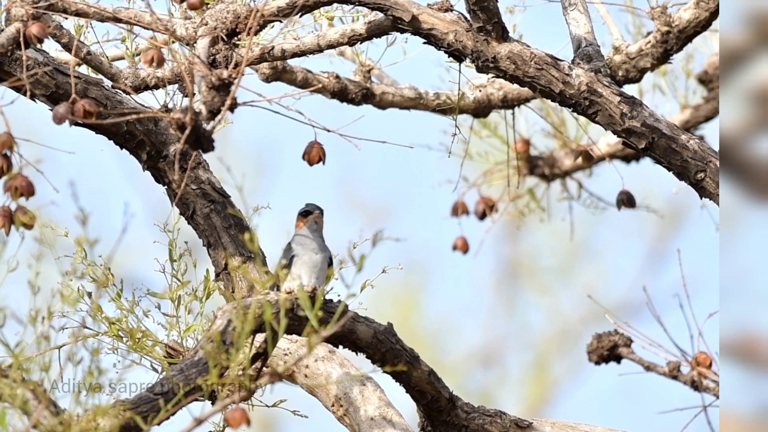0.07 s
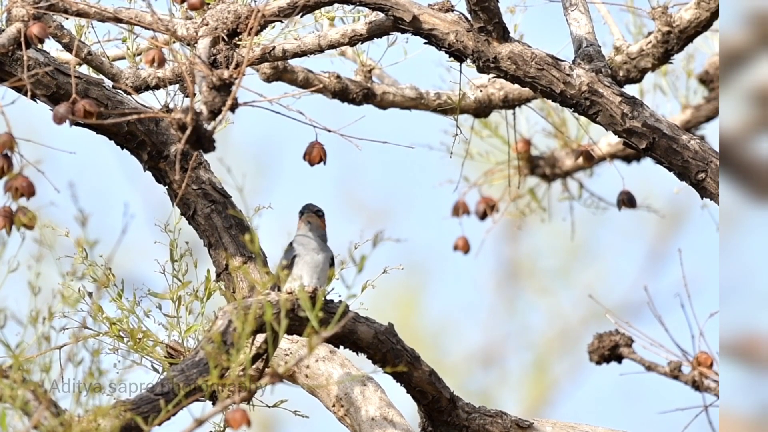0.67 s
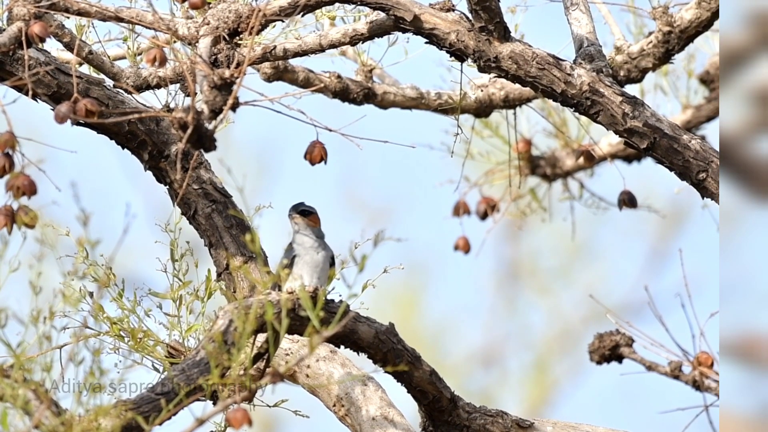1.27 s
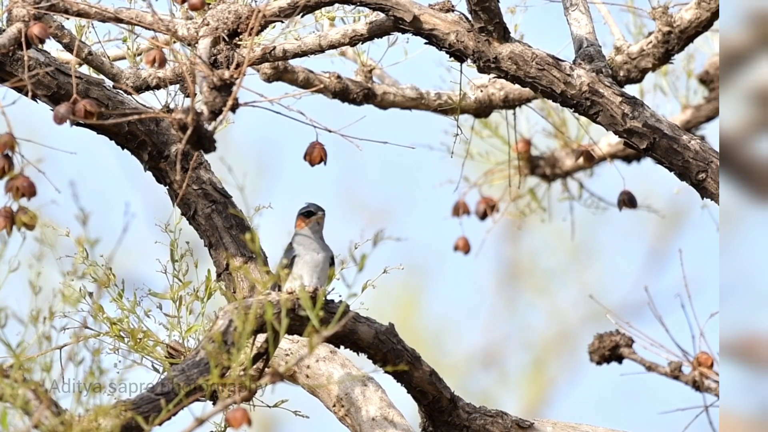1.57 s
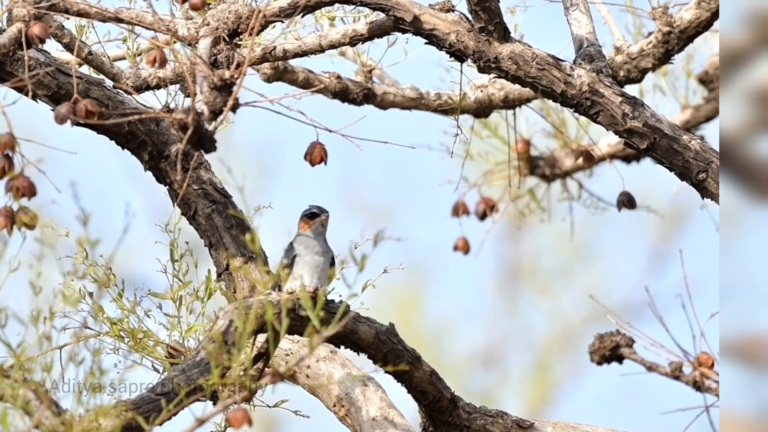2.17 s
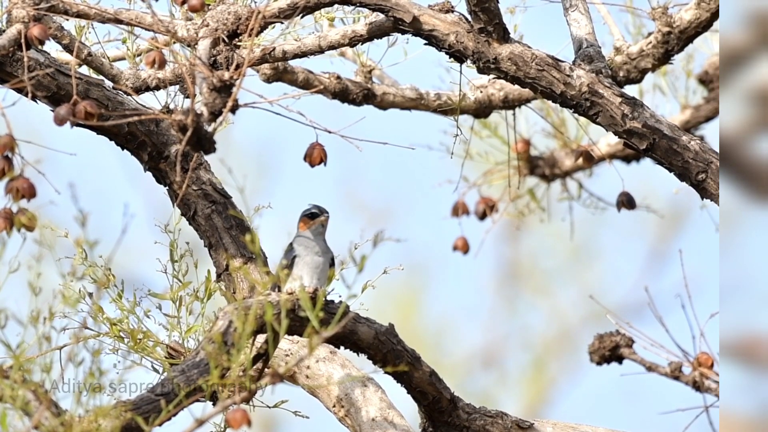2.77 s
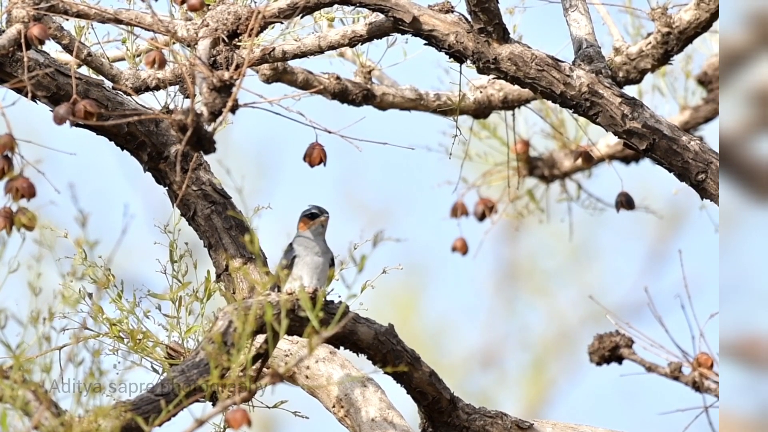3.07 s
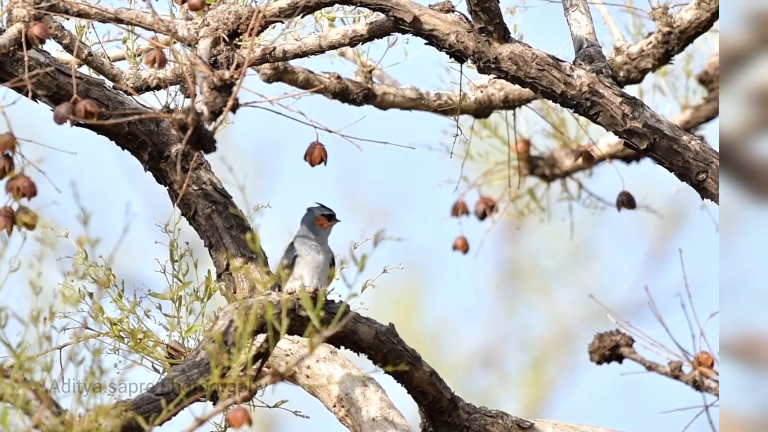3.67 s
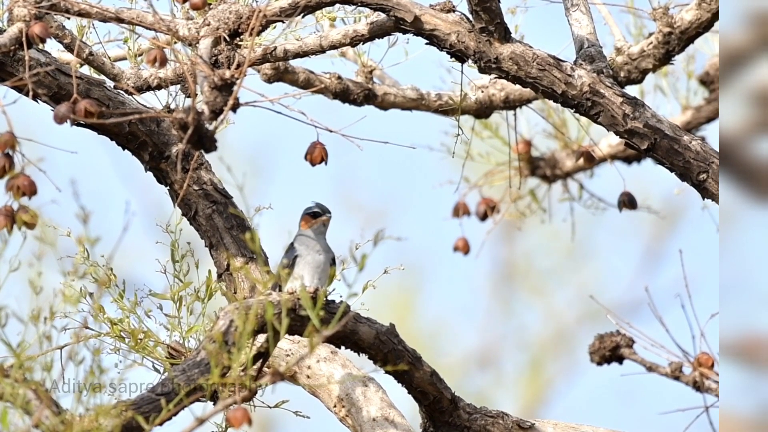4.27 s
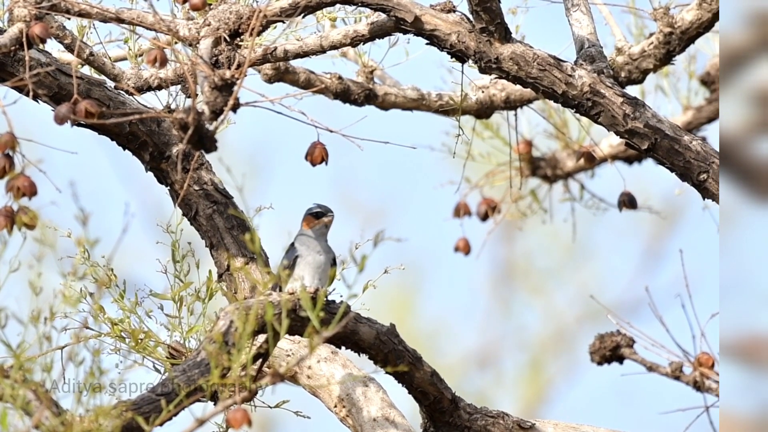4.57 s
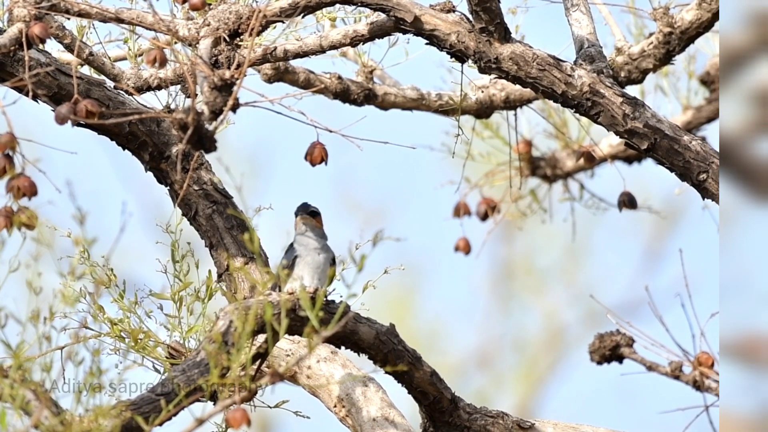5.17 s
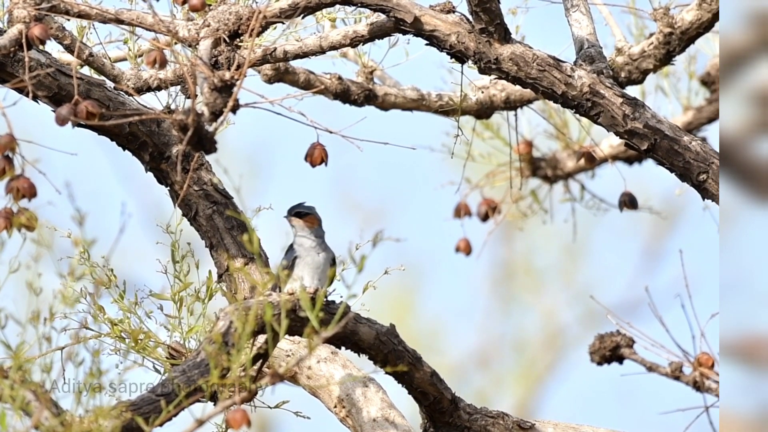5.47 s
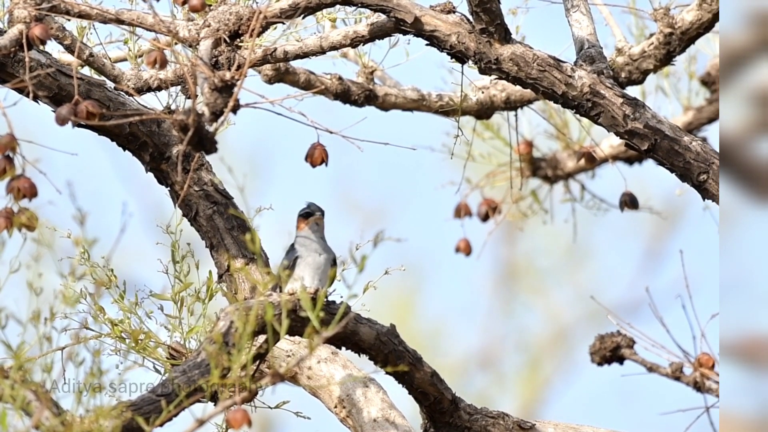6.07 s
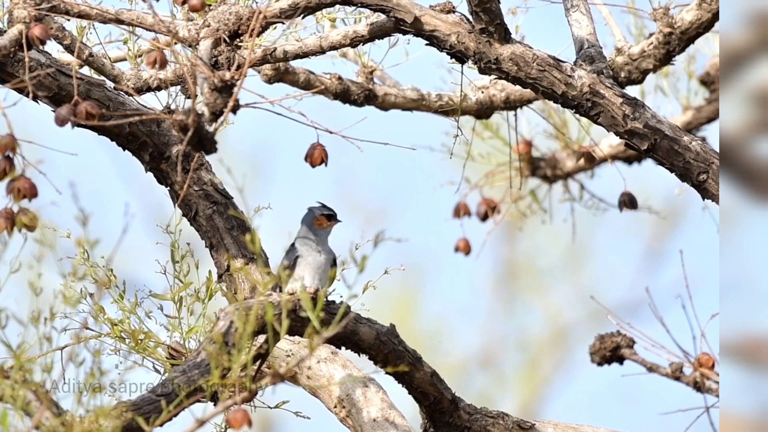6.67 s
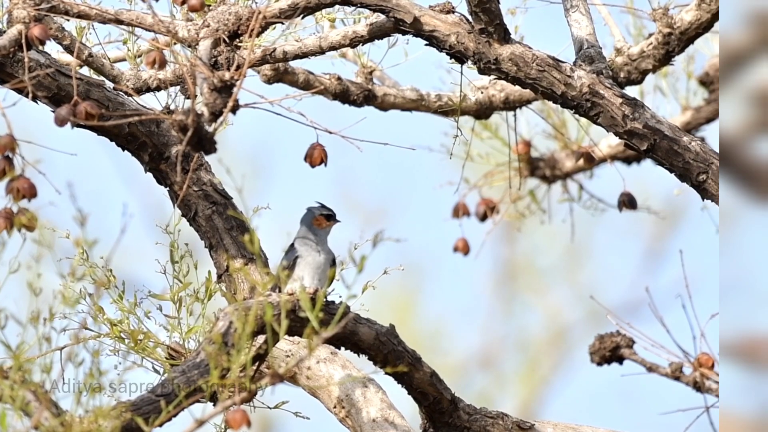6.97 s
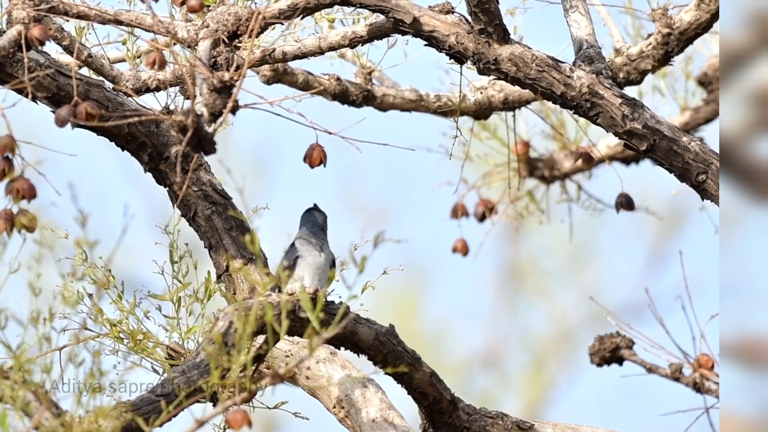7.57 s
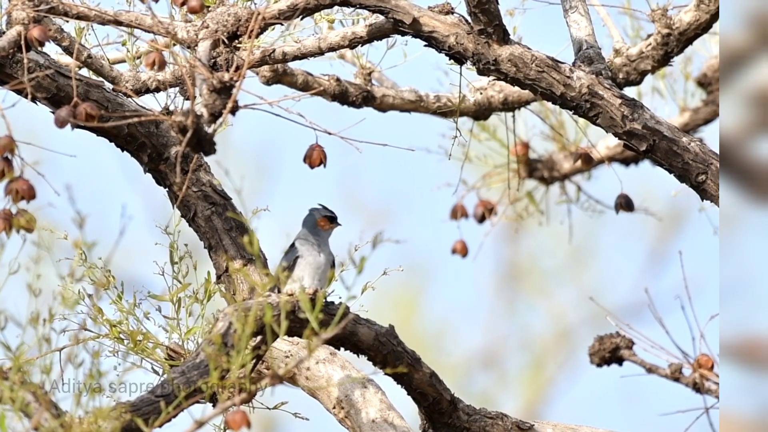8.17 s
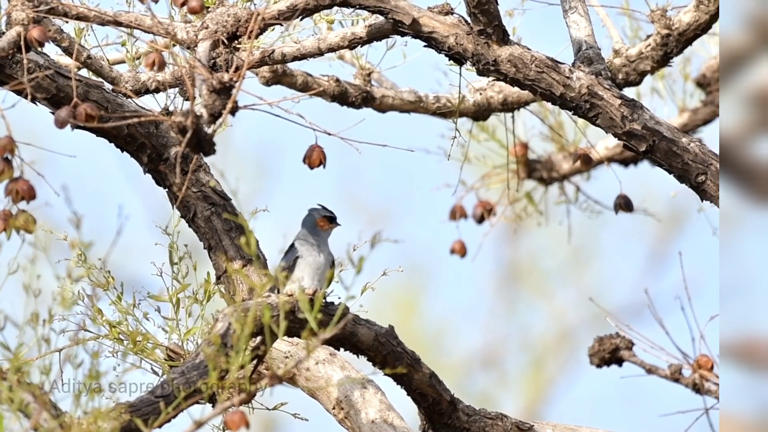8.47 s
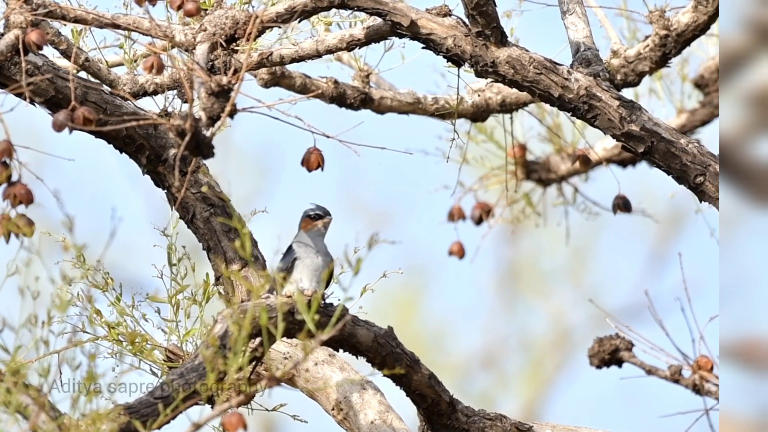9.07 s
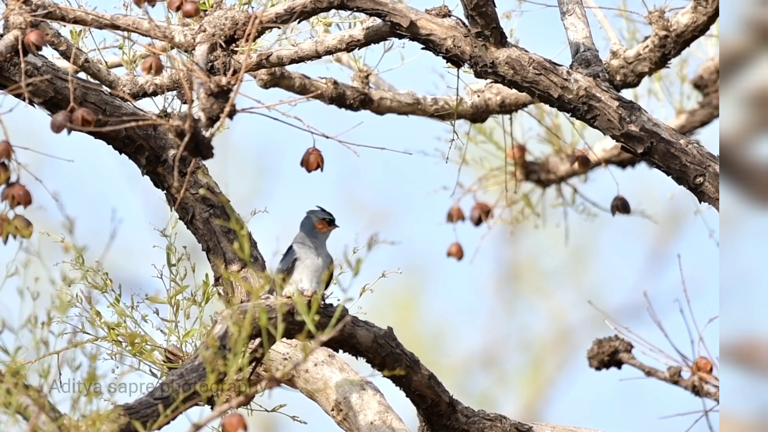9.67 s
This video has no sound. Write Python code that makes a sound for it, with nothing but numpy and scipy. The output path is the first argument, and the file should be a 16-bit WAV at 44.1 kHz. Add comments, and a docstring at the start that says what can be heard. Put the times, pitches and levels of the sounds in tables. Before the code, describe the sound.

A small bird gives one sharp, close call in quiet woodland, while distant birds chirp and light wind buffets the microphone.

```python
"""A small bird on a branch close to the microphone gives one sharp call in open woodland,
an arch of pitch whose harmonics sweep through the resonances of its beak. Farther off, birds
chirp, whistle and trill, their echoes scattered by trunks and leaves, over a soft hiss and a
distant drone. Light gusts buffet the right side of the microphone, and a few twigs tick."""
import sys
import numpy as np
from scipy import signal
from scipy.fft import rfft, irfft
from scipy.io import wavfile
from scipy.ndimage import uniform_filter1d

SR = 44100
rng = np.random.default_rng(int(sys.argv[2]) if len(sys.argv) > 2 else 0)


def digitize_waveform(pressure):
    """Quantize a signal to 16-bit integers and store it at the path in sys.argv[1].

    Rows of a 2-D input are taken as channels; values are limited to [-1, 1].
    """
    field = np.atleast_2d(pressure).T
    bounded = np.clip(field, -1, 1)
    quanta = np.round(bounded * 32767).astype(np.int16)
    wavfile.write(sys.argv[1], SR, quanta)


N = 437031


def gain_of(db):
    """Decibels to amplitude."""
    return 10 ** (np.asarray(db) / 20)


def unit_rms(x):
    """Scales to rms 1."""
    return x / np.sqrt(np.mean(x ** 2) + 1e-20)


def at_hz(points, hz):
    """Reads a table on a log-frequency axis."""
    f, value = np.transpose(points)
    return np.interp(np.log(hz + 1), np.log(f + 1), value)


def curve(rows, column=1):
    """One column of a timed table, at every sample."""
    rows = np.asarray(rows)
    return np.interp(np.arange(N) / SR, rows[:, 0], rows[:, column])


def place(mix, start_s, sound, pan_db=0):
    """Mixes a sound in, pan_db louder on the left; it reaches the microphone's far side later."""
    lag_s_per_db, longest_lag_s = 2.5e-5, 1.6e-4
    for channel, lean_db in zip(mix, (pan_db, -pan_db)):
        lag_s = np.clip(-lean_db * lag_s_per_db, 0, longest_lag_s)
        part = channel[round(start_s * SR) + int(lag_s * SR):][:len(sound)]
        part += gain_of(lean_db / 2) * sound[:len(part)]


def wander(n, rate_hz):
    """Smooth random motion of rms 1."""
    hz = np.fft.rfftfreq(n, 1 / SR)
    return unit_rms(irfft(rfft(rng.standard_normal(n)) / (1 + (hz / rate_hz) ** 4), n))


def noise(colour, patchy_db=0, likeness=None, size=1024):
    """Stereo noise of a given colour, with drifting patches in time and pitch."""
    frames, hz = 4 * N // size + 5, np.fft.rfftfreq(size, 1 / SR)
    a, b, c, d, patches = rng.standard_normal((frames, len(hz), 5)).T
    patches = unit_rms(uniform_filter1d(uniform_filter1d(patches, size=9, axis=0), size=7, axis=1))
    shared = np.clip(at_hz(likeness, hz), -1, 1)[:, None] if likeness else 0
    left = a + 1j * b
    right = shared * left + np.sqrt(1 - shared ** 2) * (c + 1j * d)
    spectra = np.array([left, right]) * gain_of(patchy_db * patches)
    white = signal.istft(spectra, nperseg=size, noverlap=size - size // 4)[1][:, :N]
    tilt = gain_of(at_hz(colour, np.fft.rfftfreq(N, 1 / SR)))
    return unit_rms(irfft(rfft(white) * tilt, N))


def note(length_s, first_hz, middle_hz, last_hz, rough, flutter_hz, flicker_db=0):
    """A whistled glide through three pitches, with a flutter in pitch and strength."""
    progress = np.linspace(0, 1, max(int(length_s * SR), 64))
    hz = np.polyval(np.polyfit([0, .5, 1], [first_hz, middle_hz, last_hz], 2), progress)
    hz *= 1 + rough * wander(len(hz), flutter_hz)
    swell = np.sqrt(2 * abs(np.sin(np.pi * progress)))
    flicker = unit_rms(gain_of(flicker_db * wander(len(hz), flutter_hz)))
    return swell * flicker * np.sin(2 * np.pi * np.cumsum(hz) / SR)


def trees(x, t60, gap_s=.002):
    """Trunks and leaves scatter sparse echoes, different on each side of the microphone."""
    t = np.arange(SR) / SR
    taps = rng.standard_normal((2, SR)) * (rng.random((2, SR)) < 2000 / SR)  # 2000 echoes a second
    taps *= gain_of(-60 * t / t60) * (t > gap_s)
    taps /= np.linalg.norm(taps, axis=1, keepdims=True)
    return signal.fftconvolve(x, taps, axes=1)[:, :N]


def air():
    """The hush of the woods all round, with narrow bands of distant drone and a thin insect whine."""
    # Still air. Each row: frequency in Hz, relative spectral level in dB.
    colour = [(15, -48), (25, -9.5), (91, -1.5), (113, -4.5), (174, -9), (194, -11.5), (261, -10.5),
              (291, -13.5), (324, -13.5), (540, -24), (618, -14), (1030, -18.5), (1630, -21), (5200, -27),
              (15700, -36.5)]
    # How alike the two channels are. Each row: frequency in Hz, correlation.
    likeness = [(30, 0.26), (100, 0.93), (290, 0.69), (640, 0.15), (1400, -0.43), (3100, -0.51),
                (7000, -0.08), (15000, 0.18)]
    # Where the hush leans. Each row: frequency in Hz, left over right in dB.
    lean = [(40, -9.5), (200, 1.5), (400, 2), (1300, -3.5), (4400, 0.6), (15000, -2)]
    # Drone and whine. Each row: centre in Hz, width in Hz, level in dB.
    drones = [(86.8, 12.7, -57), (175.3, 13.3, -66.5), (514, 104, -67.5), (644.7, 13.5, -69.5),
              (9250, 70, -96)]
    hz = np.fft.rfftfreq(N, 1 / SR)
    lean_db = at_hz(lean, hz) * np.array([[.5], [-.5]])
    hush = gain_of(lean_db - 51) * rfft(noise(colour, patchy_db=1, likeness=likeness))
    white = rfft(noise([(1, 0), (SR / 2, 0)], likeness=likeness))
    bands = 0
    for centre, width, db in drones:
        peak = gain_of(db) * np.sqrt(SR / 2 / width)
        bands += peak / (1 + ((hz - centre) / (width * np.sqrt(.5))) ** 4)
    return irfft(hush + white * bands, N)


def chorus():
    """Many far birds and insects, mostly off to the right, blur into three restless bands."""
    # One voice range per band. Each row: frequency in Hz, relative spectral level in dB.
    ranges = [
        [(500, -35), (950, -16), (1280, 5.5), (1600, 0), (2200, -7), (2700, -14), (8000, -44)],
        [(1000, -39), (1800, -11.5), (2400, 1.5), (3100, -0.5), (4000, -7), (5000, -29), (10000, -35)],
        [(2000, -24), (3500, -4), (5200, 0.5), (7000, -2), (7900, -16.5), (10000, -23)],
    ]
    # The chorus swells and ebbs. Each row: time in seconds, then low, middle and high band in relative dB.
    levels = [(0, -64, -62.5, -62.5), (2.5, -69.5, -65.5, -61), (3.4, -60, -64.5, -64.5),
              (4.2, -62, -59, -63), (4.65, -56.5, -57, -59), (5.2, -71, -62, -67), (5.8, -66, -63, -64),
              (6.02, -64, -60.5, -69), (6.27, -56, -62, -65), (6.55, -66, -63, -67),
              (7.4, -70.5, -66, -67.5), (8.2, -69, -61, -64), (9.9, -62.5, -59, -56)]
    voices = sum(noise(colour, patchy_db=3) * gain_of(curve(levels, column) - 1)
                 for column, colour in enumerate(ranges, 1))
    pan_db = curve([(0, -.5), (4.5, -7.5), (7.5, -12.5), (9.9, -7)])
    return voices * gain_of([pan_db / 2, -pan_db / 2])


def chirps(scoop=.32):
    """Short glides of small birds in the surrounding trees, and one raspy squeak."""
    # Chirps. Each row: start and length in seconds, first and last pitch in Hz,
    # relative level in dB, left over right in dB.
    glides = [(0.008, 0.056, 4160, 3270, -55.5, 15.5), (0.411, 0.021, 3910, 5030, -48.5, 8),
              (0.421, 0.09, 3675, 2540, -52, 1.5), (0.774, 0.028, 6300, 4550, -44, -3),
              (0.802, 0.017, 3950, 5700, -49, 3), (0.814, 0.016, 5700, 4000, -46, 2.5),
              (0.856, 0.022, 4430, 4050, -48.5, 10), (.91, 0.022, 3380, 3630, -53, 13),
              (0.938, 0.0282, 3850, 2990, -51, 5), (2.424, 0.044, 3150, 2900, -53, 14.5),
              (2.745, 0.093, 3270, 3210, -65, 18), (2.989, 0.12, 3380, 2970, -57, 9),
              (3.278, 0.15, 2885, 2880, -58.5, -3), (3.434, 0.027, 4300, 3400, -52.5, 4.5),
              (3.83, 0.018, 3260, 4000, -52, -3.5), (4.064, 0.038, 3040, 2590, -53.5, -5),
              (4.268, 0.023, 5300, 3350, -51.5, 11), (5.147, 0.095, 3005, 3620, -51.5, -12.5),
              (5.165, .06, 6180, 7060, -60, -8), (5.225, 0.047, 4700, 5240, -52.5, -7),
              (5.707, .035, 6080, 3990, -49, 5.5), (6.086, .044, 5600, 5090, -53, 4.5),
              (6.242, .04, 4450, 5520, -59, 6.5), (7.31, 0.045, 5750, 2680, -56.5, 9),
              (7.846, 0.029, 6200, 3820, -55, -1), (8.246, .047, 4840, 2510, -50, 9),
              (8.832, .016, 6030, 4500, -51, 10), (8.929, 0.0096, 4700, 7500, -45.5, -9),
              (8.94, 0.013, 6520, 3140, -42, -4.5), (8.957, 0.009, 4250, 6500, -48, -8),
              (9.397, 0.022, 5900, 4140, -52, 9), (9.558, .11, 2860, 3860, -47.5, -12),
              (9.653, .06, 4560, 5050, -63, -6)]
    # Parts of the squeak. Each row: start and length in seconds, first, middle and last pitch in Hz,
    # relative level in dB, left over right in dB.
    squeak = [(3.614, 0.036, 3700, 4030, 4300, -49, 0.0056), (3.62, 0.04, 7900, 7330, 6800, -46.5, 0),
              (3.644, 0.046, 6000, 5020, 4650, -45.5, 0), (3.655, .025, 9900, 9200, 7800, -61, 0)]
    clear, harsh = np.zeros((2, 2, N))
    for start, length, first, last, db, pan_db in glides:
        middle = min(first, last) + scoop * abs(last - first)  # each chirp lingers low
        scratchy = abs(last - first) / length > 12000  # steep glides break up
        rough, flicker_db = (.035, 4.5) if scratchy else (.007, 3)
        chirp = note(length, first, middle, last, rough, flutter_hz=200, flicker_db=flicker_db)
        place(clear, start, gain_of(db) * chirp, pan_db)
    for start, length, *pitches, db, pan_db in squeak:
        rasp = note(length, *pitches, rough=.062, flutter_hz=604, flicker_db=4.5)
        place(harsh, start, gain_of(db) * rasp, pan_db)
    echoes = gain_of(-6.5) * trees(clear, t60=.3) + trees(harsh, t60=.5)
    return gain_of(-3) * clear + gain_of(-1.5) * harsh + echoes


def twitter(count=100):
    """Tiny flicks of song from birds deep in the canopy."""
    out = np.zeros((2, N))
    for when, pitch, slope, size, side in rng.random((count, 5)):
        hz, glide = 3000 + 2600 * pitch, 1 + .5 * (slope - .5)
        flick = note(.027, hz / glide, hz, hz * glide, rough=.029, flutter_hz=300)
        place(out, when * N / SR, gain_of(-70 + 5 * size) * flick, pan_db=10 * (side - .5))
    return out + trees(out, t60=.21)


def twigs(decay_s=.0012):
    """Dry ticks left of the microphone, each a tiny burst in a broad resonance."""
    # Each row: start in seconds, level in dB, resonance in Hz.
    ticks = [(.385, -56, 7500), (.511, -63, 6500), (.683, -43, 4500), (2.833, -51, 7600),
             (3.249, -57, 8000), (6.935, -59, 7500)]
    out, t = np.zeros((2, N)), np.arange(SR // 50) / SR
    for start, db, hz in ticks:
        burst = rng.standard_normal(len(t)) * np.exp(-t / decay_s)
        resonance = signal.butter(2, [hz * .54, min(hz * 1.2, 12000)], "band", fs=SR)
        tick = signal.lfilter(*resonance, burst)
        place(out, start, gain_of(db) * tick / np.std(tick[:SR // 250]), pan_db=8)
    return out + gain_of(-19) * trees(out, t60=.2, gap_s=.0036)


def wind_level(attack_s=.018, release_s=.015):
    """Wind at the microphone in dB: each puff swells, holds and dies away on top of the breeze."""
    # The breeze. Each row: time in seconds, level in dB.
    breeze = [(0, -68), (1.5, -53.5), (2, -50.5), (2.9, -51.5), (4.1, -44.5), (5.55, -51), (5.9, -56),
              (6.6, -50.5), (7.2, -55.5), (7.75, -51), (8.25, -30), (8.8, -28), (9.5, -31.5), (9.9, -32.5)]
    # The puffs. Each row: start and length of the hold in seconds, level in dB.
    puffs = [(0.49, 0.16, -44), (1.79, 0.17, -42), (2.17, 0.156, -43.5), (2.412, 0.077, -41.5),
             (2.793, 0.023, -40), (3.018, 0.076, -34), (3.182, .26, -30.5), (3.623, 0.18, -46.5),
             (4.134, 0.19, -37.5), (4.39, .13, -33), (4.728, .05, -39), (4.881, .11, -31),
             (5.047, 0.12, -34), (5.272, 0.18, -39), (5.679, .1, -37), (6.01, .3, -42), (6.43, 0.025, -43),
             (6.596, 0.22, -37.5), (6.818, 0.14, -33), (7.34, .09, -44), (7.962, 0.052, -34.5),
             (8.156, 0.317, -25), (8.997, 0.53, -27.5), (9.842, 0.12, -30)]
    t = np.arange(N) / SR
    power = gain_of(curve(breeze)) ** 2
    for start, length, db in puffs:
        falloff = np.maximum(start - t, 0) / attack_s + np.maximum(t - start - length, 0) / release_s
        power += (gain_of(db) * np.exp(-np.minimum(falloff, 20))) ** 2
    return 10 * np.log10(power)


def wind():
    """Eddies buffet the microphone's right port; stronger gusts shed smaller ones and sound brighter."""
    # Eddies of a light and a strong gust. Each row: frequency in Hz, relative spectral level in dB.
    light_gust = [(10, -35), (25, -36), (50, -0.5), (90, 2.5), (175, -2.5), (250, -18.5), (400, -49.5),
                  (900, -72)]
    strong_gust = [(10, -50), (25, -30), (50, -23), (85, 3.5), (165, 2), (250, -6.5), (350, -15),
                   (500, -27.5), (800, -39.5), (1500, -80)]
    level_db = wind_level()
    force = np.clip((level_db + 42.5) / 19, 0, 1) ** 1.9
    push = np.sqrt(1 - force) * noise(light_gust, size=2048)
    push += np.sqrt(force) * noise(strong_gust, patchy_db=2.5, size=2048)
    push /= np.sqrt(uniform_filter1d(push ** 2, size=2200, axis=1) + 1e-9)  # even out the noise's swells
    flutter_db = 2.03 * wander(N, rate_hz=37)
    return push * gain_of(level_db + flutter_db) * gain_of([[-24], [-.5]])


def thumps():
    """Lone eddies hit the right port: one swing of pressure and its rebound each."""
    # Each row: time of the peak in seconds, peak level in dB, pitch in Hz, half-length in seconds.
    eddies = [(1.637, -14, 135, .003), (2.199, -28.5, 130, .005), (2.44, -24.5, 65, .007)]
    swings = np.zeros(N)
    for peak_s, db, hz, half_length in eddies:
        t = np.arange(N) / SR - peak_s
        envelope = gain_of(db) / np.cosh(np.clip(t / half_length, -20, 20))
        swings -= envelope * np.cos(2 * np.pi * hz * t)
    return swings * gain_of([[-30], [0]])


def near_bird():
    """Close and central, an arch of pitch sweeps its harmonics through the resonances of the beak."""
    # What throat and open beak let through. Each row: frequency in Hz, gain in dB.
    beak = [(900, -25), (1500, -18), (2100, -14), (2800, -12.5), (3400, -11.5), (4150, -2), (5300, -0.5),
            (6000, -16), (7100, -17.5), (8300, -13.5), (9200, -23), (10500, -23.5), (11600, -37),
            (14700, -41)]
    # The beak shuts and its resonances sink. Each row: time in seconds, factor on their frequency.
    beak_opening = [(1.835, 0.98), (1.86, 0.73), (1.89, 0.74)]
    start_s, top_s, end_s = 1.763, 1.801, 1.935
    start_hz, top_hz, rest_hz, half_sink_s = 1052, 2114, 564, .044
    attack_s, hold_s, release_s = .014, .082, .017
    db_per_octave, fade_db_per_s = 11, 175
    t = np.arange(start_s, end_s, 1 / SR)
    age = t - start_s
    rising = top_hz - (top_hz - start_hz) * ((top_s - t) / (top_s - start_s)) ** 2
    sinking = rest_hz + (top_hz - rest_hz) / (1 + ((t - top_s) / half_sink_s) ** 2)
    hz = np.where(t < top_s, rising, sinking)
    effort_db = -23.5 + db_per_octave * np.log2(hz / top_hz) - fade_db_per_s * np.maximum(age - hold_s, 0)
    opening = np.interp(t, *np.transpose(beak_opening))
    rough = np.interp(hz, [850, 1200, 2000], [.03, .016, .005])  # the voice frays as its pitch drops
    turns = np.cumsum(hz * (1 + rough * wander(len(t), rate_hz=630))) / SR
    voice = 0
    for k in range(1, 9):
        flicker_db = 20 * np.sqrt(rough) * wander(len(t), rate_hz=210)
        harmonic = np.sin(2 * np.pi * (k * turns + rng.random()))
        voice += gain_of(at_hz(beak, k * hz / opening) + flicker_db) * harmonic
    voice *= np.minimum(age / attack_s, 1) * np.clip((end_s - t) / release_s, 0, 1)
    call = np.zeros((2, N))
    place(call, start_s, np.sqrt(2) * voice * gain_of(effort_db), pan_db=-.6)
    return call + call_echoes(call)


def call_echoes(call):
    """Near branches throw the call back first, then the woods beyond."""
    # The nearest limbs. Each row: delay in seconds, gain in dB, left over right in dB.
    limbs = [(.009, -9.5, 3), (.018, -17, -4), (0.032, -21, 6)]
    highpass = signal.butter(2, 2600, "high", fs=SR, output="sos")  # long waves slip past twigs
    scattered = signal.sosfilt(highpass, call)
    branches = gain_of(-9.5) * trees(scattered, t60=.35, gap_s=.006)
    for delay_s, db, pan_db in limbs:
        place(branches, delay_s, gain_of(db) * scattered[0], pan_db)
    return branches + gain_of(-25) * trees(scattered, t60=.55, gap_s=.04)


def trill(start_s=4.0, notes_per_s=21.2, count=14, accent_db=5, accent_s=.07):
    """Back among the trees, a fast two-voiced trill sinks and fades."""
    out = np.zeros((2, N))
    for age in np.arange(count) / notes_per_s:
        low_hz, high_hz = 3520 - 480 * age, 6000 - 1200 * age
        low_db = -55.5 - 8 * age
        high_db = -53 - 13 * age + accent_db * np.exp(-age / accent_s)
        low = note(.0187, low_hz * .8, low_hz, low_hz * 1.09, rough=.017, flutter_hz=500)
        high = note(.038, high_hz * .98, high_hz, high_hz * 1.01, rough=.031, flutter_hz=600)
        place(out, start_s + age, gain_of(low_db) * low)
        place(out, start_s + age + .0049, gain_of(high_db) * high, pan_db=4)
    return gain_of(-1.5) * out + gain_of(-2) * trees(out, t60=.25)


def whistler(pan_db=-3):
    """A far bird, a little to the right, repeats a rising whistle with a shorter note just behind."""
    # Each row: start in seconds, lowest pitch in Hz, relative levels of whistle and answer in dB.
    whistles = [(4.1, 1550, -66, -70), (4.28, 1560, -63, -72), (4.48, 1500, -62, -69),
                (4.67, 1670, -63, -69), (4.85, 1720, -61, -64), (5.06, 1640, -62, -72),
                (5.5, 1490, -67, -70), (5.68, 1400, -63, -72), (5.89, 1760, -66, -67),
                (6.29, 1656, -66, -70), (7.08, 1424, -68, -61), (7.32, 1600, -65, -71),
                (7.53, 1680, -63, -65), (7.73, 1720, -65, -67), (7.98, 1640, -64, -68),
                (8.18, 1570, -62, -67), (8.41, 1880, -62, -69)]
    out = np.zeros((2, N))
    for start, hz, db, answer_db in whistles:
        rise = np.interp(start, [5, 7.3], [1.24, 1.5])  # the slurs steepen as the song goes on
        slur = note(.1, hz, hz * rise ** .18, hz * rise, rough=.005, flutter_hz=80)
        answer = note(.065, 1400, 1690, 1850, rough=.005, flutter_hz=80, flicker_db=2)
        place(out, start, gain_of(db) * slur, pan_db)
        place(out, start + .06, gain_of(answer_db) * answer, pan_db)
    return gain_of(-1.5) * out + gain_of(-6) * trees(out, t60=.4)


def scene():
    """The woodland as it reaches the microphone."""
    birds = near_bird() + chirps() + twitter() + whistler() + trill() + chorus()
    return birds + twigs() + wind() + thumps() + air()


def record(dry):
    """The recorder cuts off the highest treble."""
    edge_hz = 15800
    lowpass = signal.firwin(1023, edge_hz, window=("kaiser", 9), fs=SR)
    return signal.oaconvolve(dry, lowpass[None], "same")


dry = scene()
out = record(dry)
digitize_waveform(out)
```